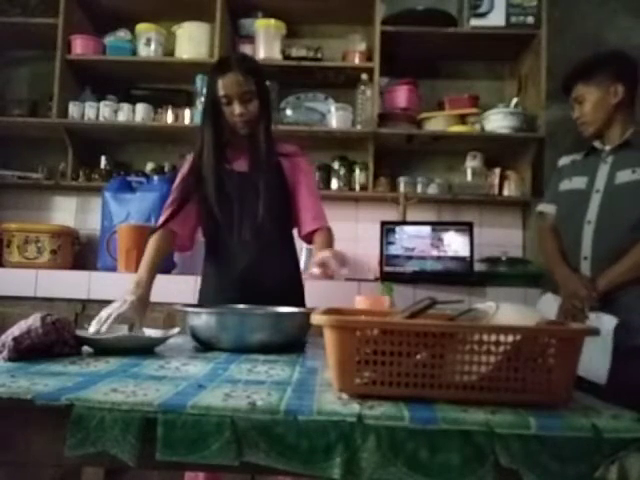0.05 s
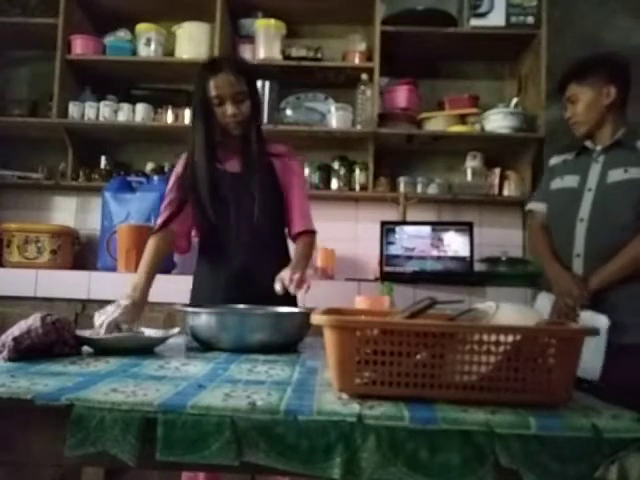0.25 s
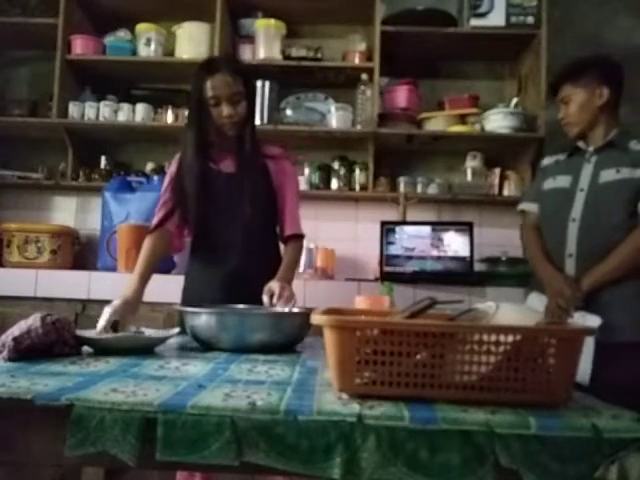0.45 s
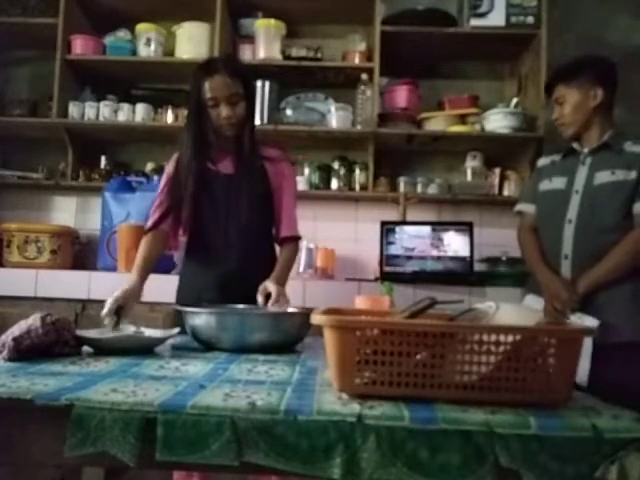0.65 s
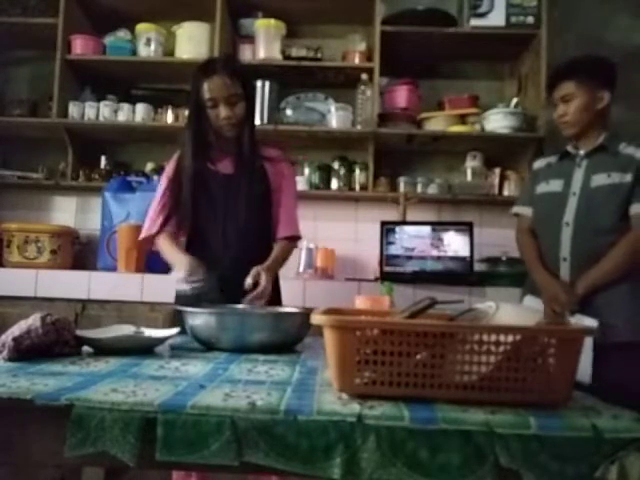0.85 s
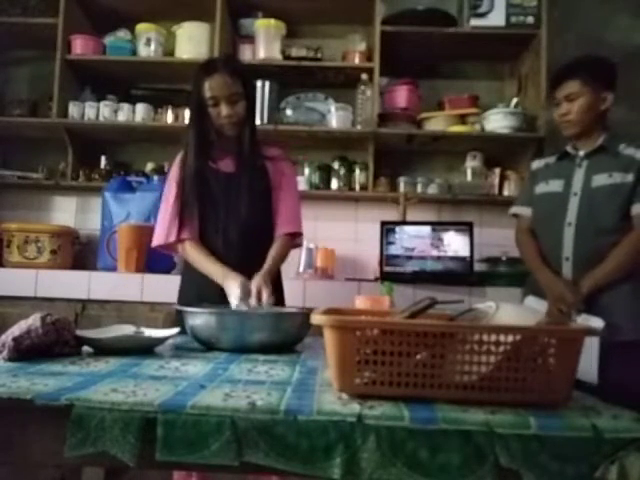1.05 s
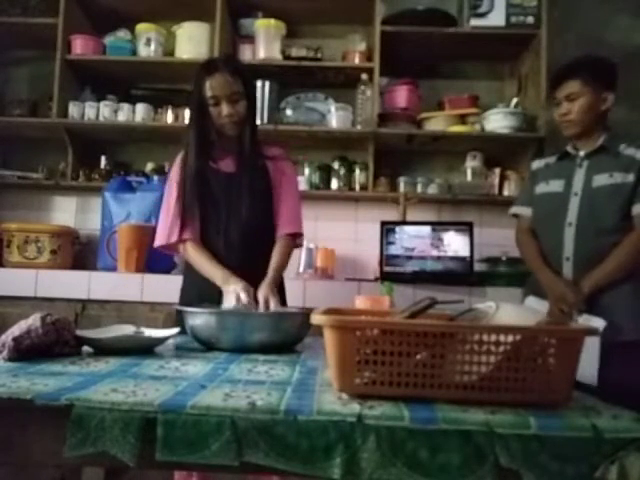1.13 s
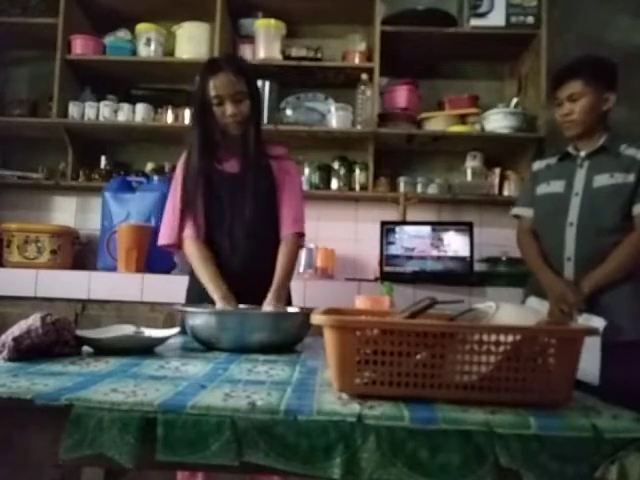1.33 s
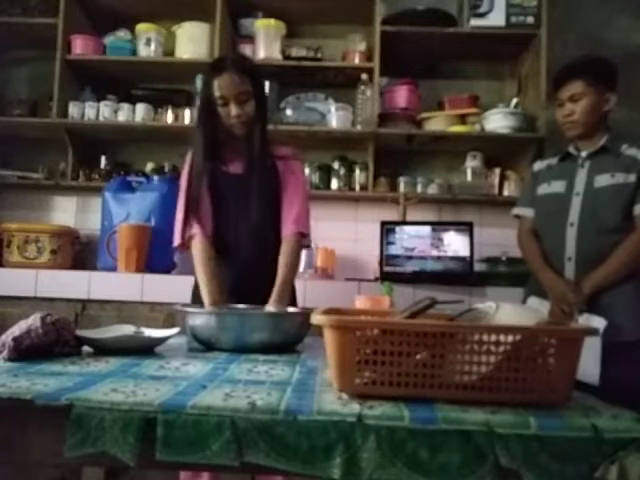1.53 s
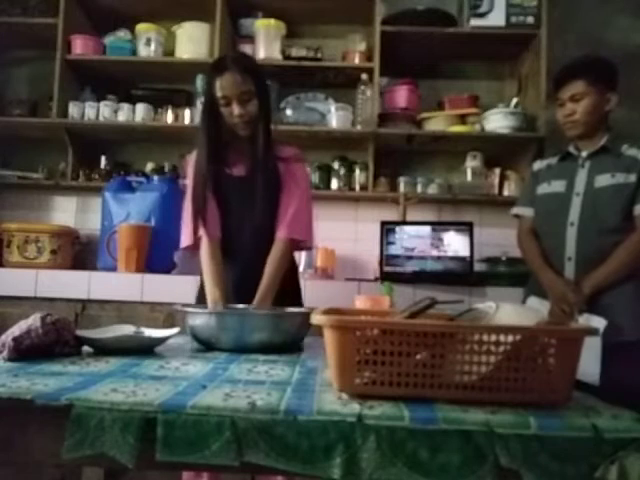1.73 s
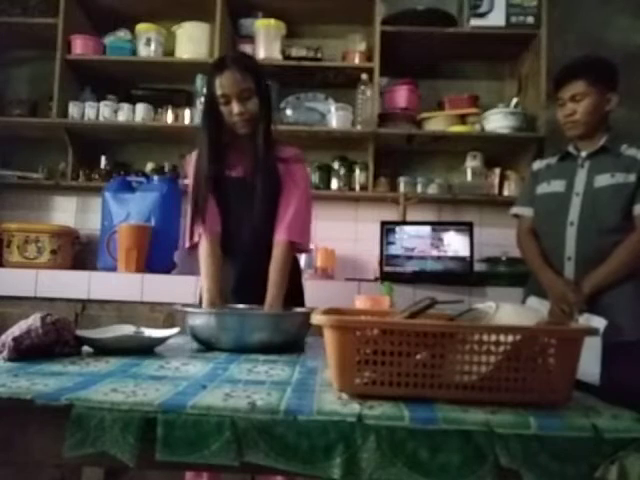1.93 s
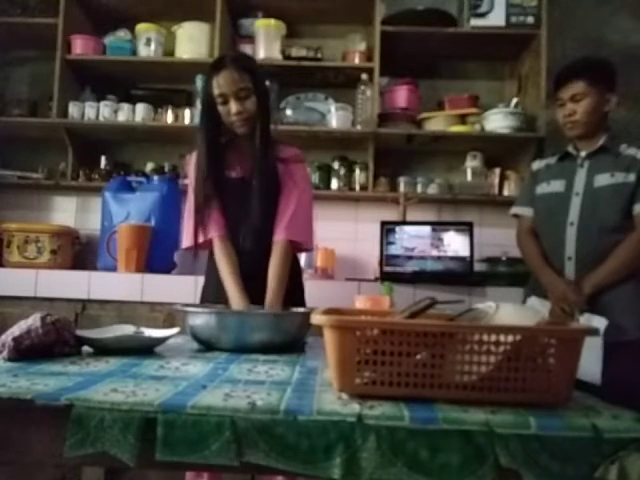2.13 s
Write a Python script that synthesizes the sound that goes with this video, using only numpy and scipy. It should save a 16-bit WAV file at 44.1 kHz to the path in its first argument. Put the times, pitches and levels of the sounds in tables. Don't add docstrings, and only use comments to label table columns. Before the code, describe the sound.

Cutlery rattles loudly off a plate with a bright spoon clang, then a small clink, a faint rub, a basin knock and a dish bump, in a small tiled kitchen, picked up by a phone.

```python
import sys
import numpy as np
from scipy import signal
from scipy.fft import rfft, irfft, next_fast_len
from scipy.io import wavfile
from scipy.ndimage import uniform_filter1d, map_coordinates

SR = 44100
rng = np.random.default_rng(int(sys.argv[2]) if len(sys.argv) > 2 else 0)


def decibels_to_gain(level_db):
    exponent = np.asarray(level_db, float) / 20
    return 10 ** exponent


def unload_audio(sound):
    columns = np.transpose(np.atleast_2d(sound))
    steps = np.round(np.clip(columns, -1, 1) * 32767)
    wavfile.write(sys.argv[1], SR, steps.astype(np.int16))


N = 97020

# hz, level_db
PLATE_CRACK = [(120, -64), (200, -25), (783, -13), (842, -18), (1130, -15), (2560, -7), (3240, -0.5),
               (7620, -6.5), (15500, -28.5)]
# hz, level_db
RUBBED_CRACK = [(1500, -62), (2600, -19.5), (3400, -15.5), (4300, -7), (7500, -3), (10000, -15),
                (15500, -23.5)]
MODES_OVER_CRACK_DB = dict(plate=4, settle=2.5, spoon=6, cutlery=3.5, basin=9, dish=12, wall=4, slide=-7.5)
# time_s, level_db
COMPRESSOR_SWELL = [(0, -1), (.7, -1.5), (.95, -5), (1.2, 0), (1.8, 1), (2.2, -1.5)]


def unit(x):
    return x / np.sqrt(np.mean(x ** 2) + 1e-20)


def along(points, hz):
    f, v = np.transpose(points)
    return np.interp(np.log(hz + 1), np.log(f + 1), v)


def wobble(rate):
    knots = rng.standard_normal(int(N * rate / SR) + 4)
    return map_coordinates(knots, [np.arange(N) * rate / SR])


def filtered(x, response):
    m = next_fast_len(len(x) + SR // 4)
    hz = np.fft.rfftfreq(m, 1 / SR)
    return irfft(rfft(x, m) * response(hz), m)[:len(x)]


def causal(gain):
    cepstrum = irfft(np.log(np.maximum(gain, 1e-6)))
    cepstrum[1:len(cepstrum) // 2] *= 2
    cepstrum[(len(cepstrum) + 1) // 2:] = 0
    return np.exp(rfft(cepstrum))


def sounding(crack, modes, ring_db, bright_db):
    scatter_db, shift, narrowest = 3, .005, .009
    small_db, small_spacing_hz = 3.5, 70
    luck = rng.standard_normal((len(modes), 2)) * [scatter_db, shift]
    small = decibels_to_gain(small_db * rng.standard_normal(int(SR / small_spacing_hz)))

    def response(f):
        power = np.interp(f / small_spacing_hz, np.arange(len(small)), small) ** 2
        for (pitch_hz, width_hz, db), (luck_db, detune) in zip(modes, luck):
            half = max(width_hz, narrowest * pitch_hz) / 2
            peak = decibels_to_gain(2 * (db + luck_db - along(crack, pitch_hz) + ring_db))
            power = power + peak * half ** 2 / ((f - pitch_hz * (1 + detune)) ** 2 + half ** 2)
        tilt_db = bright_db * np.log2((f + 50) / 3000)
        return causal(decibels_to_gain(along(crack, f) + tilt_db) * np.sqrt(power))

    return response


def answer(name):
    # hz, t60_s
    kitchen_decay = [(200, 0.39), (800, 0.32), (1200, 0.5), (3000, 0.34), (6000, 0.33), (14000, 0.3)]
    reverb_db = dict(plate=4, settle=9, spoon=0, cutlery=8, basin=10, dish=5, wall=2, slide=4)
    contact_life_s = dict(plate=.0015, settle=.004, spoon=.001, cutlery=.001, basin=.0004, dish=.0005, wall=.004, slide=.001)
    first_wall_s, build_s = 0.0025, 0.0053
    hz, t, z = signal.stft(rng.standard_normal(SR // 2), SR, nperseg=256)
    decay = decibels_to_gain(-60 * t / along(kitchen_decay, hz)[:, None])
    tail = signal.istft(z * decay, SR, nperseg=256)[1][:SR // 2]
    t = np.arange(SR // 2) / SR
    tail = tail * (1 - np.exp(-np.clip(t - first_wall_s, 0, None) / build_s))
    contact = rng.standard_normal(len(t)) * t * np.exp(-t / contact_life_s[name])
    return decibels_to_gain(reverb_db[name]) * tail / np.linalg.norm(tail) + contact / np.linalg.norm(contact)


def hits(rows, name, crack, modes):
    out = np.zeros(N + SR)
    for start_s, db, bright_db in rows:
        response = sounding(crack, modes, MODES_OVER_CRACK_DB[name], bright_db)
        sound = filtered(answer(name), response)
        out[round(start_s * SR):][:SR // 2] += decibels_to_gain(db + 13.5) * sound / np.linalg.norm(sound)
    return out[:N]


def slides(rows, crack, modes):
    slips_per_s, slip_spread_db, rise_s = 530, -2, .025
    out, t = np.zeros(N), np.arange(N) / SR
    for start_s, length_s, first_db, last_db, bright_db in rows:
        end_s = start_s + length_s
        slips = (rng.random(N) < slips_per_s / SR) * decibels_to_gain(slip_spread_db * rng.standard_normal(N))
        response = sounding(crack, modes, MODES_OVER_CRACK_DB["slide"], bright_db)
        grit = unit(filtered(slips, response))
        stroke = decibels_to_gain(np.interp(t, [start_s, end_s], [first_db, last_db]))
        stroke *= np.clip((t - start_s) / rise_s, 0, 1) * (t < end_s)
        out += signal.fftconvolve(grit * stroke, answer("slide"))[:N]
    return out


def plate_rattle():
    # start_s, peak_db, brightness_db (an octave)
    contacts = [(0.2143, -18.5, 4.5), (0.2317, -10.5, 1), (0.2467, -16.5, -3), (0.2584, -29.5, 2.5),
                (0.2728, -18.5, -0.5), (0.292, -20.5, 6), (0.3051, -18.5, -2), (0.3195, -6, 2),
                (0.3304, -12, 6.5), (0.3393, -13, -2), (0.3524, -10.5, 0.5), (0.3652, -18.5, 2),
                (0.3775, -18, -0.5), (0.3952, -35, -4), (0.4129, -29, -0.5), (0.4422, -16.5, 1.5),
                (0.4804, -20.5, -0.5), (0.5031, -31, 0), (0.536, -23.5, -3), (0.5659, -24.5, 3.5),
                (0.5904, -40, 0.5)]
    # pitch_hz, width_hz, level_db
    plate_modes = [(796, 23, -4), (965, 28, -3.5), (1113, 44, 0), (1200.4, 37, -1.5), (1375, 24, -6),
                   (2090, 130, -5), (2880, 66, -8.5), (3237, 63, -2.5), (3766, 23, -1.5), (4420, 29, 7),
                   (5640, 140, -5.5), (6124, 45, -1), (7320, 40, -2), (7550, 60, -2.5)]
    settles_from = 15
    lively = hits(contacts[:settles_from], "plate", PLATE_CRACK, plate_modes)
    return lively + hits(contacts[settles_from:], "settle", PLATE_CRACK, plate_modes)


def spoon_on_plate():
    # start_s, length_s, first_db, last_db, brightness_db (an octave)
    drag = [
        (.195, 0.023, -53, -32.5, -3.5),
    ]
    # start_s, peak_db, brightness_db (an octave)
    strikes = [
        (.3193, -7.5, 1),
        (.3515, -15.5, 3.5),
    ]
    # pitch_hz, width_hz, level_db
    spoon_modes = [(3307, 130, 3.5), (4397, 33, 3.5), (6140, 50, 5.5), (7370, 45, 2.5), (11400, 90, -11.5),
                   (13100, 100, -15)]
    clang = hits(strikes, "spoon", PLATE_CRACK, spoon_modes)
    return clang + slides(drag, RUBBED_CRACK, spoon_modes)


def cutlery_clinks():
    # start_s, peak_db, brightness_db (an octave)
    clinks = [
        (1.0849, -27, 0.5),
        (1.0926, -15.5, 0.5),
        (1.1034, -29.5, 10.5),
        (1.1052, -22.5, 3),
        (1.1172, -33.5, -11.5),
        (1.1264, -47, -4),
    ]
    # pitch_hz, width_hz, level_db
    cutlery_modes = [(3270, 86, -11), (4810, 70, -2), (5195, 73, -9), (5230, 87, 1.5), (5530, 81, -6.5),
                     (6980, 65, -6.5), (7330, 110, -5), (8730, 140, -10), (11630, 530, -17)]
    # hz, level_db
    cutlery_crack = [(1500, -64), (2300, -26.5), (2900, -18.5), (3300, -15.5), (4000, -16.5), (5200, -8),
                     (7200, -8), (9900, -23.5), (15500, -23)]
    return hits(clinks, "cutlery", cutlery_crack, cutlery_modes)


def pieces_rubbing():
    # start_s, length_s, first_db, last_db, brightness_db (an octave)
    rub = [
        (1.385, 0.073, -54.5, -56, 0),
    ]
    # start_s, peak_db, brightness_db (an octave)
    ticks = [
        (1.4013, -46, -4),
        (1.4135, -37.5, -5.5),
        (1.4172, -43, 5),
        (1.4527, -39, 1),
    ]
    # pitch_hz, width_hz, level_db
    piece_modes = [(3360, 66, -11), (3760, 45, -4), (4230, 67, 4), (4890, 44, -11), (5970, 58, -2),
                   (7400, 86, -1), (8220, 99, 7.5)]
    rubbing = slides(rub, RUBBED_CRACK, piece_modes)
    return rubbing + hits(ticks, "cutlery", RUBBED_CRACK, piece_modes)


def basin_wall_thuds():
    # start_s, peak_db, brightness_db (an octave)
    pushes = [
        (1.398, -45, -5),
        (1.415, -42.5, 6),
        (1.44, -40, 0.5),
        (1.453, -43, 6.5),
    ]
    # pitch_hz, width_hz, level_db
    wall_modes = [(225, 10, 3.5), (370, 14, -2.5), (553, 30, -3.5), (805, 33, -7.5), (1050, 30, -14)]
    # hz, level_db
    wall_thud = [(120, -48), (200, -4), (550, -8.5), (1100, -22.5), (1400, -24.5), (3000, -48)]
    return hits(pushes, "wall", wall_thud, wall_modes)


def basin_knocks():
    # start_s, peak_db, brightness_db (an octave)
    knocks = [
        (1.7536, -19.5, -2),
        (1.7746, -31, 0),
    ]
    # pitch_hz, width_hz, level_db
    basin_modes = [(330.0, 15.6, -5.0), (454, 7.7, -12.5), (574, 14, -7), (1996, 25, -18.5),
                   (2127, 15, -12.5), (2490, 53, -11.5), (4330, 82, -6.5), (5560, 120, -6.5),
                   (7630, 48, -5.5)]
    # hz, level_db
    basin_crack = [(120, -38), (200, -19.5), (327, -14), (783, -2.5), (1560, -21), (1950, -14),
                   (5700, -3.5), (7760, -5), (15500, -35)]
    return hits(knocks, "basin", basin_crack, basin_modes)


def basin_scrapes():
    # start_s, length_s, first_db, last_db, brightness_db (an octave)
    scrapes = [
        (1.87, 0.165, -53, -48.5, -3.5),
        (2.132, 0.049, -48, -63, -8),
    ]
    pressed = [
        (1.95, 0.038, -62, -59, 1),
        (1.98, .04, -64, -53, -4),
    ]
    # pitch_hz, width_hz, level_db
    steel_modes = [(5700, 510, 13.5), (7400, 1100, 9.5)]
    # hz, level_db
    light_hiss = [(2500, -74), (4050, -43), (4400, -5), (5700, -8), (7700, -6), (9500, -9), (15500, -22)]
    # hz, level_db
    pressed_hiss = [(1800, -66), (2700, -35), (3000, -6), (3700, 3), (4400, 2), (6000, -21), (12000, -40)]
    return slides(pressed, pressed_hiss, steel_modes) + slides(scrapes, light_hiss, steel_modes)


def dish_bumps():
    # start_s, peak_db, brightness_db (an octave)
    bumps = [
        (2.0222, -23, 2.5),
        (2.0265, -31.5, -2),
        (2.036, -28, 4),
        (2.048, -34.5, -2.5),
        (2.062, -32.5, 0.5),
        (2.078, -34.5, -1),
        (2.1, -40.5, -0.5),
        (2.17, -50, -3),
    ]
    # pitch_hz, width_hz, level_db
    dish_modes = [(829, 57, 2.5), (1060, 65, -1.0), (1940, 140, -5.5), (2580, 58, 0), (4400, 100, -20),
                  (5690, 155, 3.5)]
    # hz, level_db
    dish_crack = [(210, -52), (350, -7), (563, 10), (951, -11), (1170, 1.5), (5800, 0), (9000, -8),
                  (15500, -44)]
    return hits(bumps, "dish", dish_crack, dish_modes)


def suppressed(x):
    # hz, level_db (a bin)
    threshold = [(300, -93.5), (1150, -85), (1600, -83), (2500, -82.5), (3300, -95.5), (3900, -90.5),
                 (5250, -99), (8000, -102), (15000, -114)]
    ragged_db, steepness = 1, 2
    hz, _, z = signal.stft(x, SR, nperseg=1024)
    power = uniform_filter1d(np.abs(z) ** 2, size=5, axis=0)
    ragged = np.repeat(rng.standard_normal(len(hz)), 4)[:len(hz)]
    noise = decibels_to_gain(2 * (along(threshold, hz) + ragged_db * ragged))[:, None]
    kept = z / (1 + (noise / (power + 1e-30)) ** steepness)
    return signal.istft(kept, SR, nperseg=1024)[1][:N]


def hum():
    # order, level_db
    partials = [
        (1, -62),
        (2, -68.5),
        (3, -88),
    ]
    pitch_hz, wander_db, wanders_per_s, overtones_grow = 73.4, 2, 16, 2.8
    t = np.arange(N) / SR
    phase = 2 * np.pi * pitch_hz * t + .5 * wobble(3.7)
    swell_db = np.interp(t, *np.transpose(COMPRESSOR_SWELL))
    out = np.zeros(N)
    for order, db in partials:
        swing = overtones_grow if order > 1 else 1
        level_db = db + swing * swell_db + wander_db * wobble(wanders_per_s)
        out += np.sqrt(2) * decibels_to_gain(level_db) * np.sin(order * phase)
    return out


def room_tone():
    # hz, level_db
    floor_colour = [(20, -17), (90, -4), (170, -12.5), (215, -20.5), (490, -24.5), (720, -28.5),
                    (1400, -31.5), (8500, -46.5), (15000, -58.5)]
    # start_s, length_s, pitch_hz, width_hz,
    # level_db
    patches = [(0, 0.088, 530, 50, -73), (0.3, 0.11, 770, 90, -78), (-.02, 0.074, 355, 17.3, -65),
             (.13, 0.26, 362, 5.6, -67.5), (0.34, 0.234, 336, 24, -61.5), (.65, 0.08, 498, 60, -74),
             (0.924, 0.097, 520, 79, -74), (.98, 0.276, 1019, 60, -78), (1.22, 0.133, 520, 80, -72),
             (1.6, 0.055, 1053, 27, -74.5), (1.2, 0.063, 2300, 180, -84.5), (2.1, 0.06, 3330, 150, -70),
             (0.47, 0.034, 3420, 810, -55.5), (0.618, 0.1464, 1047, 73, -74.5),
             (1.52, 0.22, 545, 126, -75.5), (1.837, 0.12, 396, 25, -70.5), (0.16, 0.015, 2300, 60, -83),
             (-0.053, 0.17, 1010, 50, -87), (1.5, 0.11, 1745, 39, -83.5), (1.6, .13, 2200, 57, -89),
             (2.7, 0.085, 2700, 63, -69), (2, .12, 10000, 67, -89), (1.87, .14, 560, 59, -67.5),
             (.95, .02, 2397, 70, -80),
        (1.0, .04, 5400, 300, -83),
        (1.01, .02, 4600, 100, -85),
        (1.055, .02, 4300, 200, -79),
             (.36, .07, 221.2, 49.3, -62.5),
        (.56, 0.047, 225, 41, -71),
        (.9, 0.086, 232, 50, -77),
        (1.61, 0.042, 225, 40, -66.5),
        (1.96, 0.042, 1050, 60, -74),
    ]
    floor_db, fade_s, flicker_db, evenness = -75, .025, 2.5, .6
    t = np.arange(N) / SR
    floor = filtered(rng.standard_normal(N), lambda f: decibels_to_gain(along(floor_colour, f)))
    out = decibels_to_gain(floor_db) * floor / np.std(filtered(floor, lambda f: f > 200))
    out *= decibels_to_gain(.5 * np.interp(t, *np.transpose(COMPRESSOR_SWELL)))
    for start_s, length_s, hz, width_hz, db in patches:
        band = unit(filtered(rng.standard_normal(N), lambda f: np.exp(-((f - hz) / width_hz) ** 2)))
        band = unit(band / np.abs(signal.hilbert(band)) ** evenness)
        to_edge_s = np.minimum(t - start_s, start_s + length_s - t)
        fade = np.clip(to_edge_s / fade_s + 1, 0, 1) ** 2
        out += decibels_to_gain(db + flicker_db * wobble(40)) * band * fade
    return out


def scene():
    on_plate = plate_rattle() + spoon_on_plate()
    in_hand = cutlery_clinks() + pieces_rubbing()
    in_basin = basin_wall_thuds() + basin_knocks() + basin_scrapes() + dish_bumps()
    return (suppressed(on_plate + in_hand + in_basin) + hum() + room_tone())[None]


def low_pass(x):
    return signal.sosfilt(signal.butter(12, 16620, fs=SR, output="sos"), x)


def record(dry):
    top_hz = 15500
    limited = filtered(dry[0], lambda f: decibels_to_gain(-30 * np.clip((f - top_hz) / 300, 0, 1)))
    return low_pass(limited[None])


dry = scene()
out = record(dry)
unload_audio(out)
```